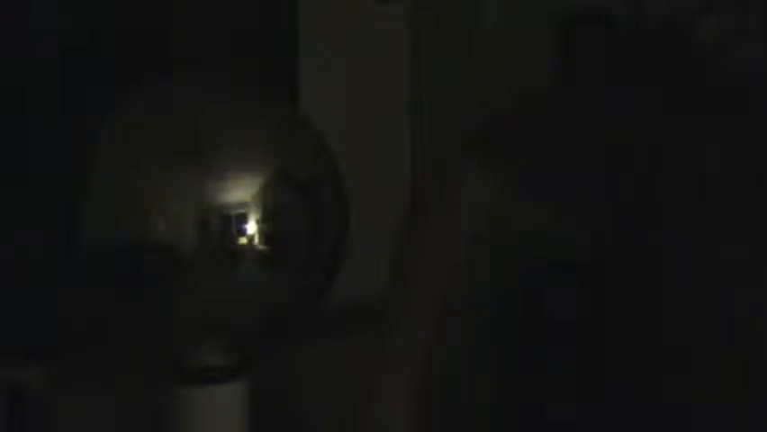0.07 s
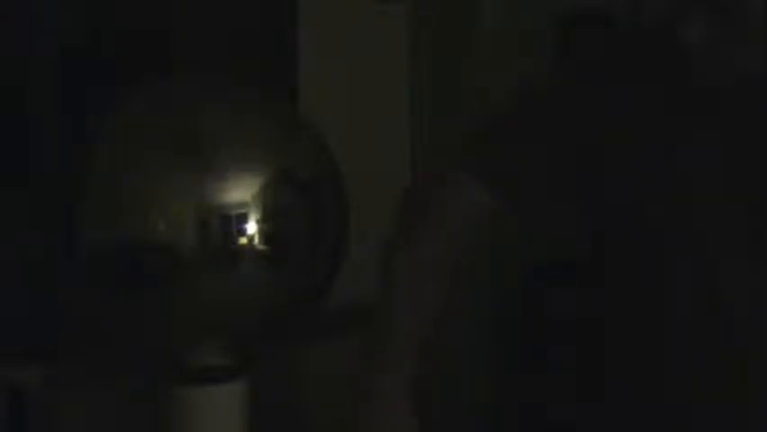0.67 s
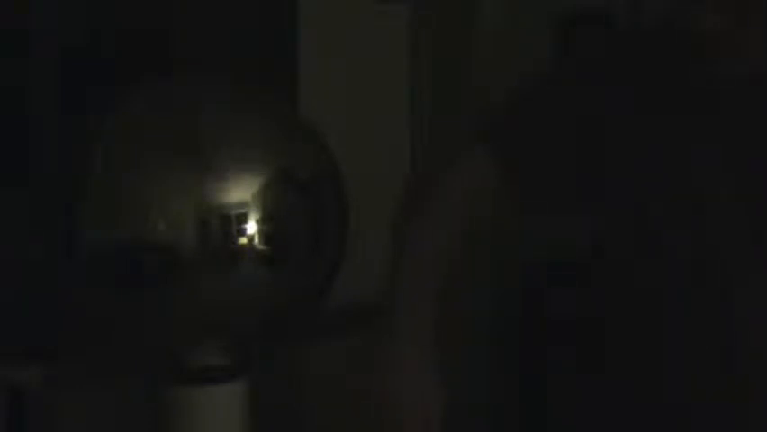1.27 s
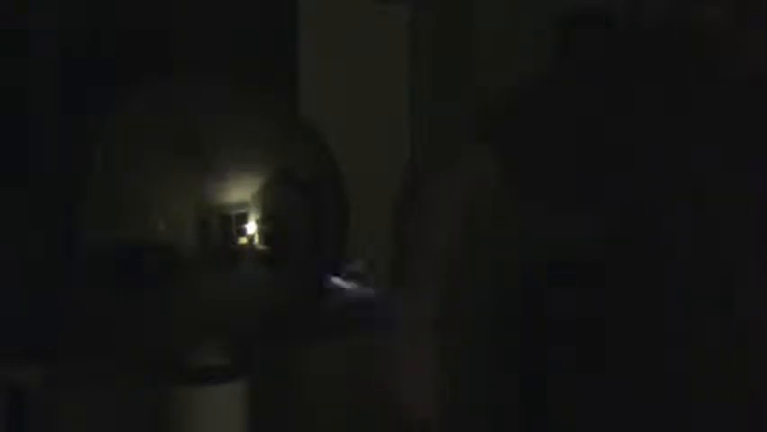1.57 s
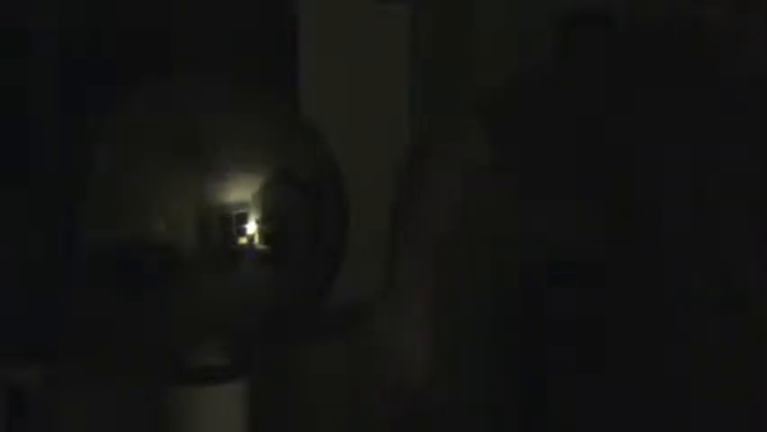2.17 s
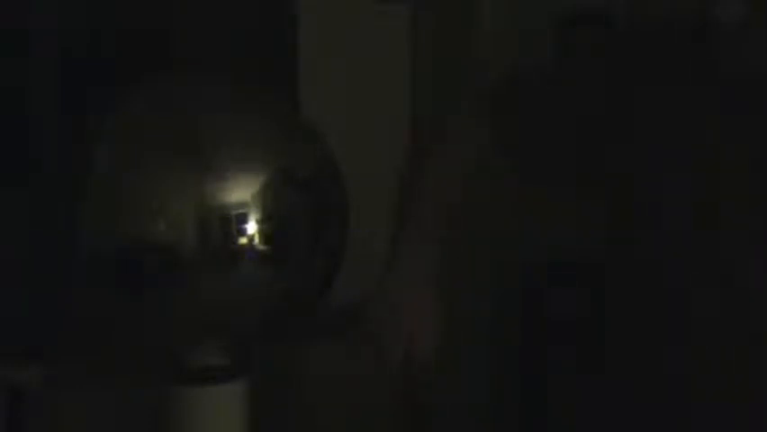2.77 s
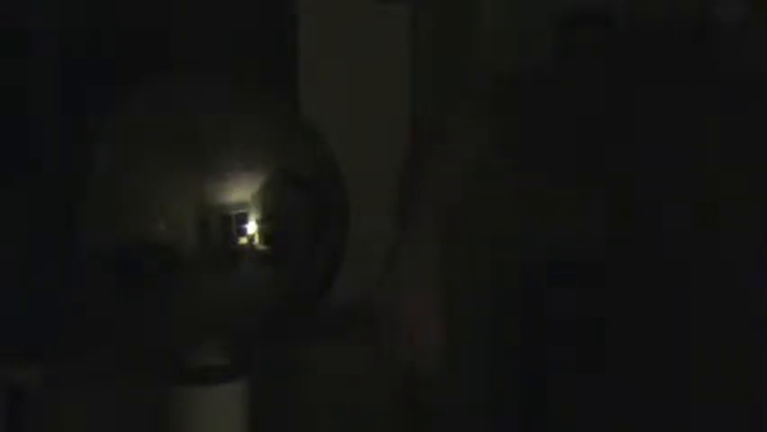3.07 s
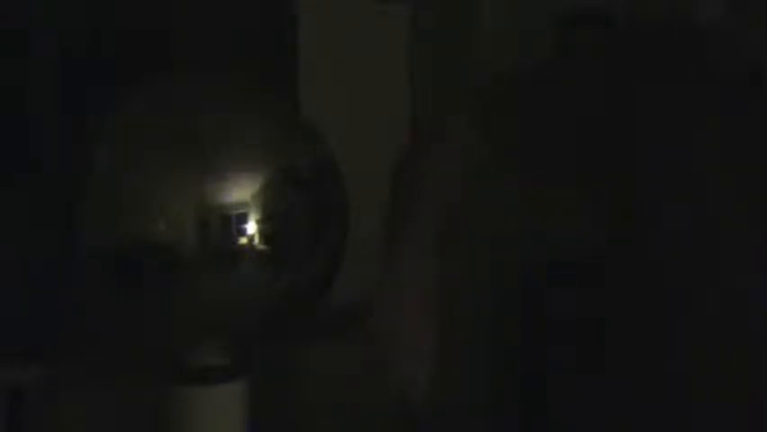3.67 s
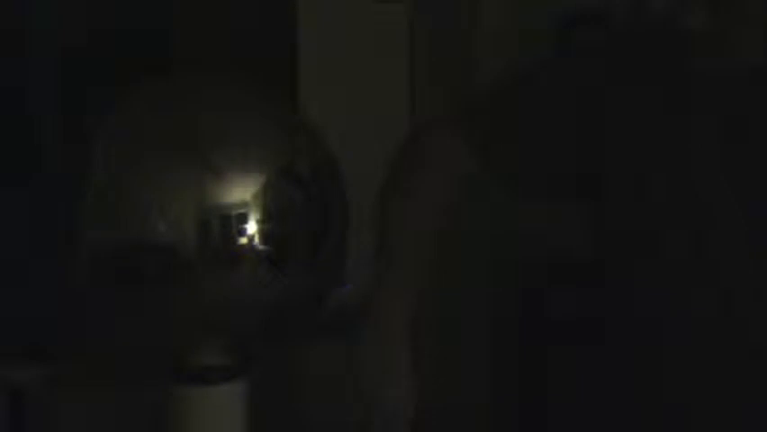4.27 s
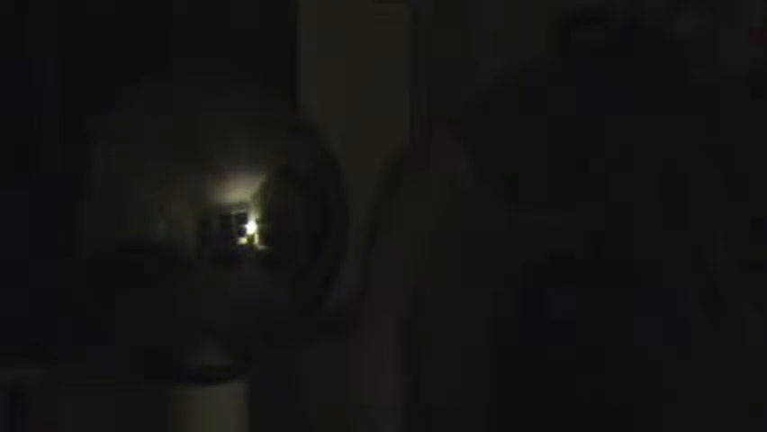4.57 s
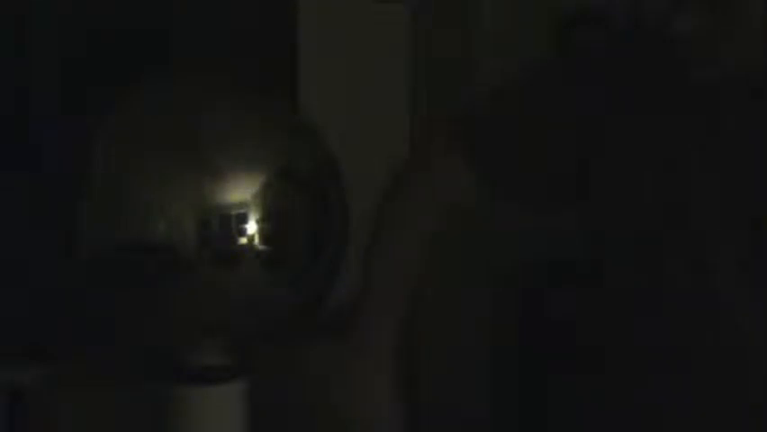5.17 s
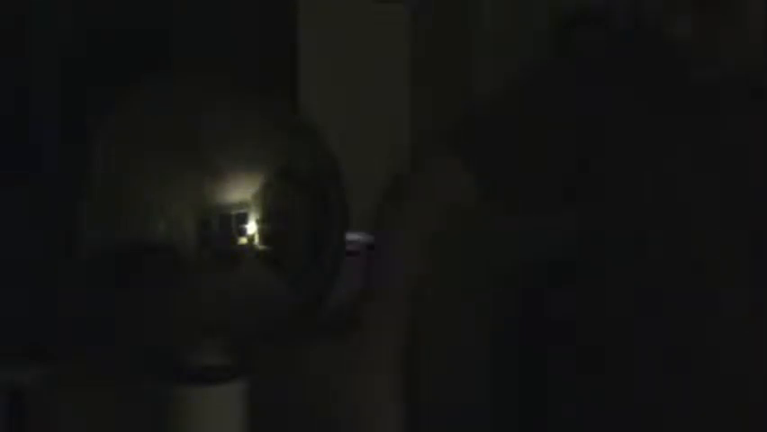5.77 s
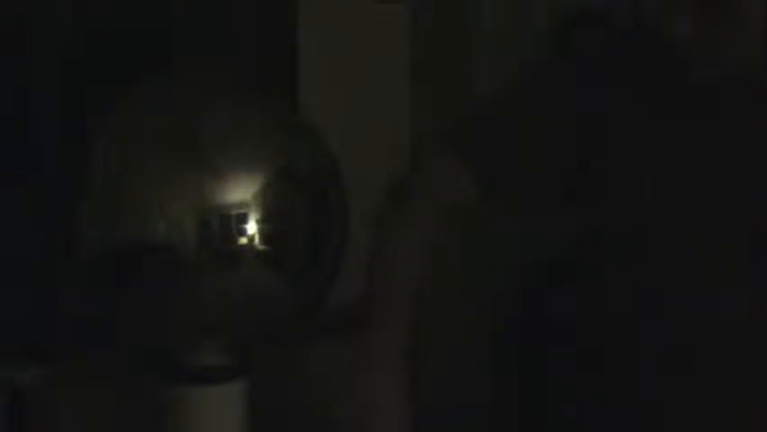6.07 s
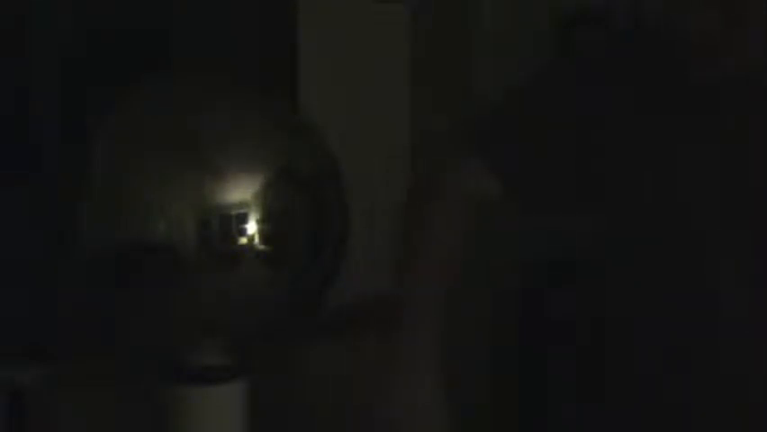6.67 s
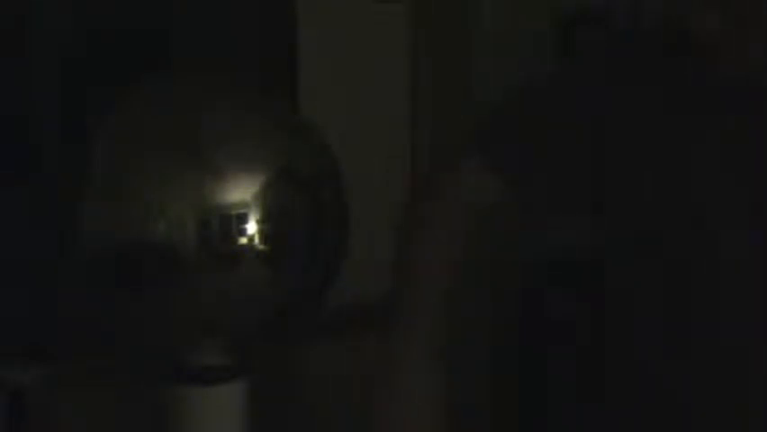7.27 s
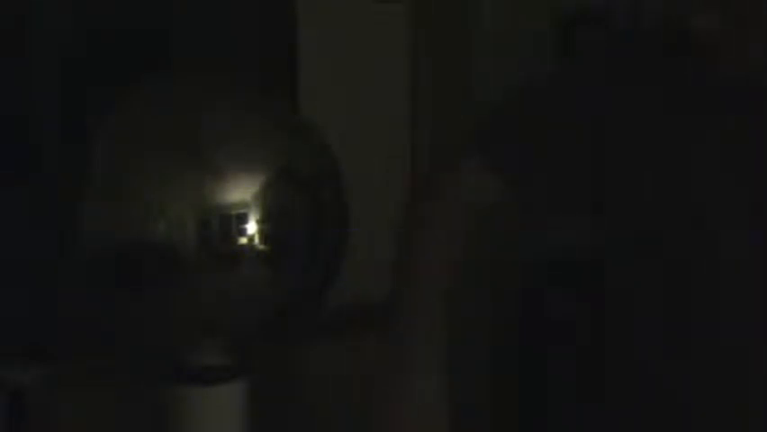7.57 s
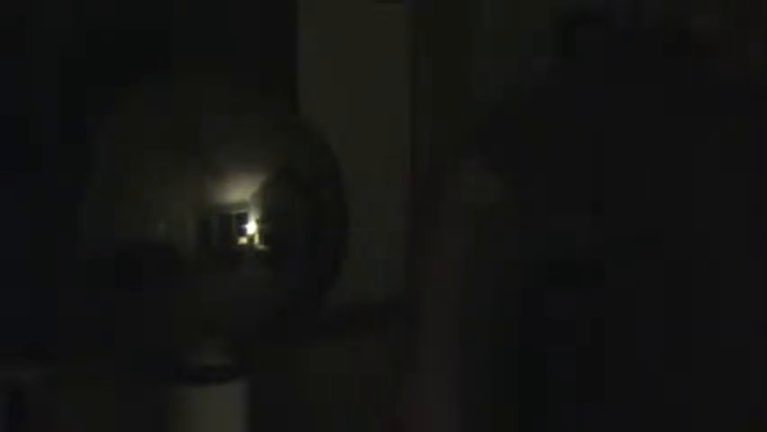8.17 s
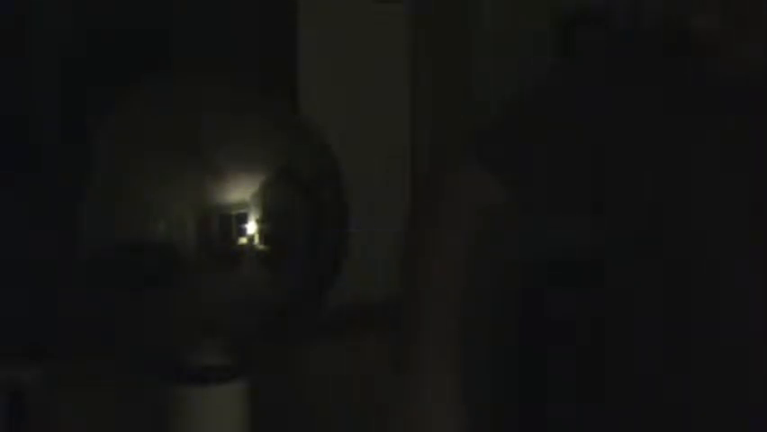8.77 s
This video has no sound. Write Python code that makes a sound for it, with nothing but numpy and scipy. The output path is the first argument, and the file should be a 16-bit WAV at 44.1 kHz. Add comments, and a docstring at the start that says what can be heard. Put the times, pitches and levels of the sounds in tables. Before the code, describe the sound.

Sharp electric snaps repeat throughout as sparks jump from a generator's metal dome, each followed by a short, bright room echo. Behind them a motor whines steadily, with the rubbing rush and low drone of a belt. The snaps come about every half second, then spread out slightly as the motor's tone shifts. The microphone clips on the cracks, briefly pushing down the machine noise.

```python
"""In a small room, a belt-driven electrostatic generator throws sparks from its dome to an arm held near it.
They snap two or three times a second, each a tiny blast wave followed by the room's echoes.
Behind them the motor whines and the belt flaps and rushes over its rollers.
Each snap overloads the camera, whose gain control turns the whir down and lets it swell back."""
import sys
import numpy as np
from scipy import signal
from scipy.fft import rfft, irfft
from scipy.io import wavfile

SR = 44100
rng = np.random.default_rng(int(sys.argv[2]) if len(sys.argv) > 2 else 0)


def to_wav(sig):
    """Store sig (one row per channel, or 1-D mono) as 16-bit WAV at the path in sys.argv[1].

    Samples outside -1..1 are clipped; the rate is SR.
    """
    pcm = np.clip(np.atleast_2d(sig), -1, 1) * 32767
    pcm = np.round(pcm).astype(np.int16)
    wavfile.write(sys.argv[1], SR, pcm.T)  # frames by channels


N = 388962
TIME = np.arange(N) / SR


def amp(db):
    """Turns decibels into a gain."""
    return 10 ** (np.asarray(db) / 20)

def unit(x):
    """Scales a signal to an average (rms) level of 1."""
    return x / np.sqrt(np.mean(x ** 2) + 1e-20)

def curve(rows):
    """Joins (seconds, value) rows with straight lines."""
    return np.interp(TIME, *np.transpose(rows))

def read(rows, hz):
    """Joins (Hz, value) rows along a log-frequency axis."""
    row_hz, value = np.transpose(rows)
    return np.interp(np.log(hz + 1), np.log(row_hz + 1), value)

def add(mix, start_s, sound):
    """Adds a stereo sound to the mix."""
    part = mix[:, round(start_s * SR):][:, :sound.shape[1]]
    part += sound[:, :part.shape[1]]

def smooth(x, seconds):
    """Follows a signal with a lag."""
    keep = np.exp(-1 / (seconds * SR))
    return signal.lfilter([1 - keep], [1, -keep], x)

def drift(rate_hz, step=100):
    """A smooth random wander, up to about rate_hz."""
    slow = TIME[::step]
    hz = np.fft.rfftfreq(len(slow), step / SR)
    spectrum = rfft(rng.standard_normal(len(slow))) * np.exp(-(hz / rate_hz) ** 2)
    return np.interp(TIME, slow, unit(irfft(spectrum, len(slow))))


# The sparks. Each row: start in seconds, level in dB, brightness from 0 to 1,
# relative size of the jolt in the camera (minus hits the left channel, plus the right).
DISCHARGES = [(.254, 6.9, 0.97, -0.33), (.739, 7.2, 1, -.16), (1.197, 7.4, 1, -0.13),
              (1.6826, 5.8, 0.73, .2), (2.1283, 7, 1, -0.32), (2.5793, 6.1, 1, -.2), (2.94, 1.6, .4, 0.089),
              (3.115, 6.5, 1, -0.21), (3.4734, 3.8, 0.64, 0.1), (3.81, 6.1, 0.92, 0.067),
              (4.1608, 6, 0.92, 0.05), (4.525, 5.5, 1, -0.19), (4.8232, 4.9, 1, -0.077),
              (5.1466, 5.2, 1, -.15), (5.5331, 4.7, 1, -0.26), (5.886, 5.5, 1, -0.079),
              (6.3726, 5, 1, -.29), (7.0038, 5, 0.44, .1), (7.6254, 6.8, 1, 1.06), (8.2164, 4.3, 1, -0.045),
              (8.712, 4.4, 0.27, 0.036)]
def sparks():
    """The dome discharges into the arm again and again."""
    out = np.zeros((2, N))
    for start_s, db, bright, _ in DISCHARGES:
        add(out, start_s, amp(db) * snap(bright))
    return out

def jolts(shortest_s=.00011, stretch_s=.00018, settle_s=.0016, cross=.28):
    """Each spark induces a kick in the camera: one channel goes down, the other slightly up."""
    out, t = np.zeros((2, N)), np.arange(SR // 25) / SR
    for start_s, _, _, size in DISCHARGES:
        age = t / (shortest_s + stretch_s * abs(size))  # harder kicks last longer
        kick = 1.33 * abs(size) * age * np.exp(1 - age)
        sides = [[cross], [-1]] if size > 0 else [[-1], [cross]]
        add(out, start_s, (kick - smooth(kick, settle_s)) * np.array(sides))
    return out

def crack(t, bright, ring_hz=8500, ring_s=.0001, blast_s=.00006):
    """A tiny blast wave and the microphone's brief ring, starting at t = 0."""
    t = np.maximum(t, 0)
    age = t / blast_s
    blast = .9 * age * (2 - age) * np.exp(-age)
    ring = t / ring_s * np.exp(1 - 2 * t / ring_s) * np.sin(2 * np.pi * ring_hz * t)
    return -bright * ring - blast

# Echoes off nearby surfaces. Each row: delay in seconds, level in dB compared with the crack.
NEAR_ECHOES = [(.0046, -7.5), (.0057, -9), (.0118, -13), (.0131, -16), (.017, -13), (.0222, -19)]
def snap(bright):
    """One spark and its echoes, which shift a little because each spark takes another path."""
    t = np.arange(SR // 3) / SR
    echoes = sum(amp(db) * crack(t - delay_s - .00006 * rng.standard_normal(), bright)
                 for delay_s, db in NEAR_ECHOES)
    early = crack(t, bright) + echoes
    return early / abs(early).max() + room_tail(t)

# The tone of the room's answer to a snap. Each row: frequency in Hz, relative level in dB.
TAIL_COLOUR = [(300, -31), (2000, -10), (6000, 4.5), (9000, 3), (12000, -1.5), (15000, -2)]
def room_tail(t, level_db=-21.5, fade_s=.25, build_s=.008):
    """Many echoes blur into a short, bright hiss that falls 60 dB in fade_s."""
    grains = rng.standard_normal((3, len(t))) * np.sqrt(rng.exponential(1, len(t)))
    scatter = grains[0] + grains[1:]  # one shared noise, plus one for each side
    colour = amp(read(TAIL_COLOUR, np.fft.rfftfreq(len(t), 1 / SR)))
    hiss = unit(irfft(rfft(scatter) * colour, len(t)))
    build = 1 - np.exp(-(t / build_s) ** 2)
    return hiss * build * amp(level_db - 60 * t / fade_s)


# The slow rise and fall in the whir's loudness as heard. Each row: time in seconds, gain in dB.
WHIR_LEVEL = [(0, -20.5), (1, -19.5), (3.3, -20), (5.3, -22), (6.3, -22), (8, -20.5)]
# How hard the motor works. Each row: time in seconds, load from 0 to 1.
MOTOR_LOAD = [(6.1, 0), (7.1, .75), (8.05, 1), (8.8, .45)]
# The machine sits a little to the right. Each row: frequency in Hz, left minus right in dB.
BALANCE = [(200, -.4), (1300, -.5), (2800, -1), (4500, -2.5), (7000, -0.1), (14000, 0)]
def generator(free_hz=145.22, sag_hz=.67, hunt_hz=.055, lap_hz=35.12):
    """Motor and belt turn together; their speed wanders a little and drops under load."""
    load = curve(MOTOR_LOAD)
    speed_hz = free_hz - sag_hz * load + hunt_hz * drift(rate_hz=2.61)
    turns = np.cumsum(speed_hz) / SR
    slip = .016 * drift(rate_hz=3.9)
    laps = turns * lap_hz * TIME[-1] / turns[-1] + slip
    whir = amp(curve(WHIR_LEVEL)) * (motor(turns, load) + belt(laps) + rush(turns, laps))
    lean_db = read(BALANCE, np.fft.rfftfreq(N, 1 / SR)) * np.array([[.5], [-.5]])
    return irfft(rfft(whir) * amp(lean_db), N)

# The tone of the rush. Each row: frequency in Hz, relative level in dB.
RUSH_COLOUR = [(25, -67), (70, -61.5), (120, -52.5), (200, -50.5), (400, -40.5), (800, -41), (1200, -37),
               (2500, -40.5), (4200, -38.5), (6500, -42), (9000, -43.5), (10000, -48.5), (13400, -51),
               (14500, -69)]
# Bands where the rush is louder; the high ones roughen the motor's whine.
# Each row: frequency in Hz, width in Hz, boost in dB.
LOUD_BANDS = [(633, 100, 3), (715, 88, 1), (1033, 36, 3.5), (1111, 36, 7.5), (1295, 57, 3.5), (1429, 34, 5),
              (1906, 104, 3.5), (2160, 30, 4), (2427, 46, 4), (3004, 210, 6), (3610, 190, 1.5),
              (5000, 54, 2), (6510, 130, 4.5), (7630, 190, 2.5), (8900, 270, 1.5)]
# How wide the rush sounds. Each row: frequency in Hz, relative level of the stereo difference in dB.
RUSH_WIDTH = [(60, -13), (99, -22), (160, -16), (270, -15), (440, -18.5), (730, -10), (1200, -12.5),
              (1980, -10.5), (3250, -8), (5360, -11), (8830, -11), (14600, -18.5)]
def rush(turns, laps, level_db=-1.64, side_db=-.2):
    """Belt and brushes rub, making a noise that pulses with the motor and the belt."""
    hz = np.fft.rfftfreq(N, 1 / SR)
    boost_db = sum(db * np.exp2(-(2 * (hz - centre) / width) ** 2) for centre, width, db in LOUD_BANDS)
    mode_hz = np.arange(0, SR / 2, 22)  # many small resonances of the room and frame
    ripple_db = np.interp(hz, mode_hz, rng.standard_normal(len(mode_hz))) * np.minimum(hz / 900, 1)
    colour_db = read(RUSH_COLOUR, hz) + boost_db + ripple_db
    chop = sum(depth * np.cos(2 * np.pi * k * turns) for k, depth in enumerate([.075, .06, .03], 1))
    flutter = .018 * np.cos(2 * np.pi * laps) + .035 * drift(rate_hz=27) + .075 * drift(rate_hz=160)
    rubbing = rng.standard_normal((2, N)) * (1 + chop + flutter)
    mid, side = irfft(rfft(rubbing) * amp([colour_db, colour_db + side_db + read(RUSH_WIDTH, hz)]), N)
    return amp(level_db) * (mid + side * np.array([[1], [-1]])) / mid.std()

# The whine's tones. Each row: multiple of the motor's speed, relative dB running free, and working hard.
MOTOR_TONES = [(1, -33, -35), (2, -28, -28), (3, -21, -22.5), (4, -20, -20), (7, -24, -24), (8, -24, -21),
               (11, -28, -28), (12, -23, -28), (13, -16, -16), (14, -24, -21), (15, -26, -28),
               (17, -30, -30), (20, -28, -28), (21, -24, -24), (24, -21, -31), (25, -19.5, -26),
               (26, -16, -15.5), (27, -23, -17.5), (28, -23, -32), (29, -28, -29), (33, -26, -29),
               (34, -17.5, -23), (38, -29, -32), (39, -29, -28), (40, -28, -24), (43, -24, -30),
               (44, -27, -23), (46, -29, -29), (48, -29, -28), (52, -31, -29), (53, -24.5, -24),
               (54, -30, -24), (58, -30, -32), (61, -31, -26), (62, -30, -27), (63, -30, -29),
               (66, -33, -34), (74, -36, -36), (78, -39, -35), (80, -37, -38), (81, -39, -39)]
def motor(turns, load, strain_load=.6, lift_db=.04):
    """The motor whines in a stack of sharp tones whose balance changes under load."""
    strain = np.clip(load / strain_load, 0, 1)
    turns = turns + .0015 * drift(rate_hz=18)  # the belt tugs at the shaft
    whine = np.zeros((2, N))
    for k, free_db, strained_db in MOTOR_TONES:
        level = amp(free_db) * (1 - strain) + amp(strained_db) * strain
        whine += amp(lift_db * k) * level * tone(k * turns, waver=.26, spread=.15)
    return whine

# The flapping belt's tones. Each row: multiple of the belt's lap rate, relative level in dB.
BELT_TONES = [(1, -46), (2, -61), (3, -67), (4, -39), (5, -30), (6, -22.5), (7, -30.5), (8, -36.5),
              (9, -25.5), (10, -30), (11, -39.5), (12, -27.5), (13, -33), (14, -33.5), (15, -30)]
def belt(laps):
    """The belt's seam shakes the frame once a lap, making a low, uneven drone."""
    return sum(amp(db) * tone(k * laps, waver=.25, spread=.057) for k, db in BELT_TONES)

def tone(cycles, waver, spread):
    """One wavering tone that reaches the two microphones slightly out of step."""
    angle = 2 * np.pi * ((cycles + rng.random()) % 1)
    apart = spread * rng.choice([-1, 1])
    strength = np.sqrt(2) * (1 + waver * drift(rate_hz=8.9))
    return strength * np.cos([angle + apart, angle - apart])


def scene():
    """Sparks snap over the whirring machine."""
    return generator() + sparks()

def gain_control(dry, threshold_db=-5, slope=.76, attack_s=.0005, recover_s=.091, memory_s=.86):
    """The camera's gain drops at each peak, then comes back in a quick and a slow stage."""
    log_excess = np.log(np.maximum(abs(dry).max(0) / amp(threshold_db) - 1, 1e-6))
    leak = TIME / recover_s  # the peak detector's charge leaks away
    held = np.exp(np.maximum.accumulate(log_excess + leak) - leak)
    held_db = slope * 20 * np.log10(1 + held)
    duck_db = smooth(held_db, attack_s) + .36 * smooth(held_db, memory_s)
    return dry * amp(-duck_db)

# How the camera softens high sounds. Each row: frequency in Hz, gain (1 means unchanged).
CAMERA_TREBLE = [(0, 1), (10000, 1), (13000, .63), (14500, .5), (SR / 2, .5)]
def record(dry, ceiling=.63, cutoff_hz=14350):
    """Cracks outrun the camera's gain control and clip; jolts join in and the treble is dulled."""
    clipped = np.clip(gain_control(dry), -ceiling, ceiling)
    jolted = np.clip(clipped + jolts(), -1, 1)
    treble = signal.firwin2(63, *np.transpose(CAMERA_TREBLE), fs=SR)
    lowpass = signal.firwin(301, cutoff_hz, window=("kaiser", 9), fs=SR)
    soft = signal.oaconvolve(jolted, treble[None], "same")
    return signal.oaconvolve(soft, lowpass[None], "same")


dry = scene()
out = record(dry)
to_wav(out)
```